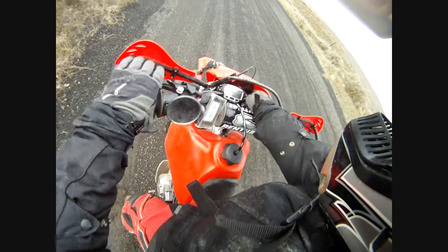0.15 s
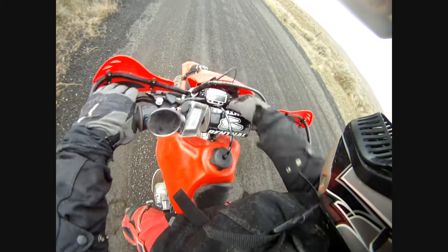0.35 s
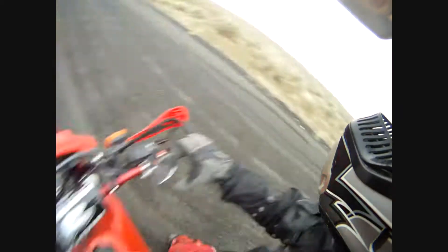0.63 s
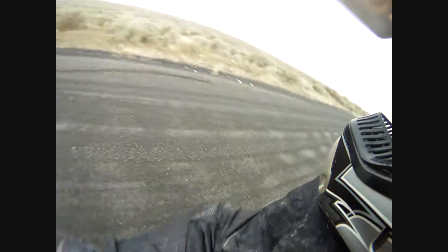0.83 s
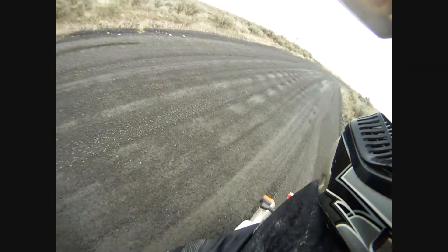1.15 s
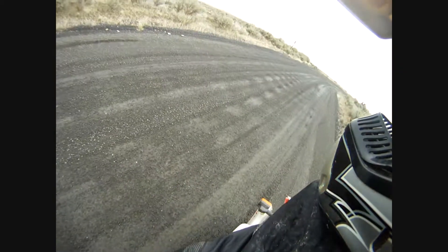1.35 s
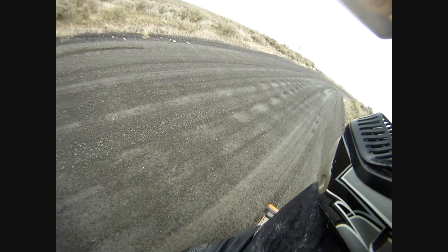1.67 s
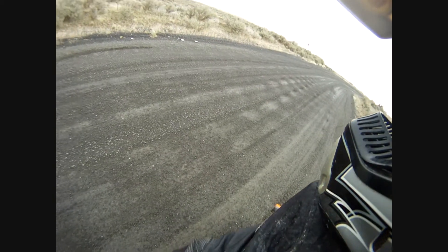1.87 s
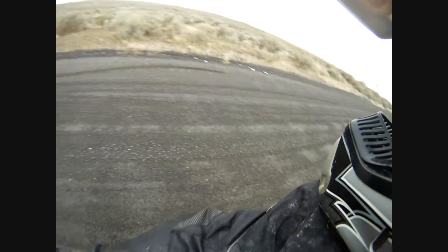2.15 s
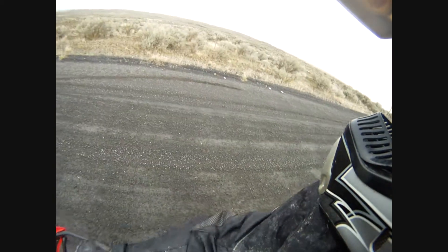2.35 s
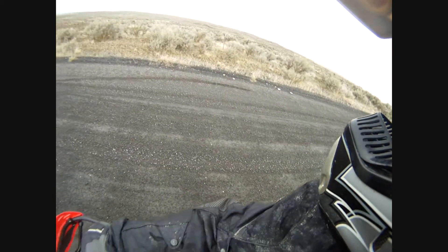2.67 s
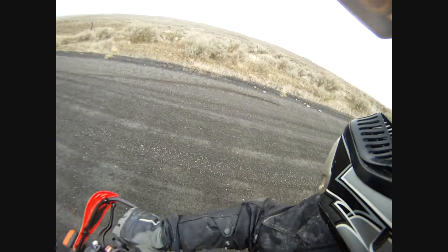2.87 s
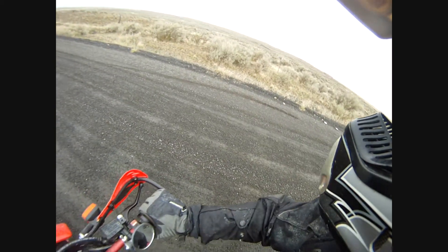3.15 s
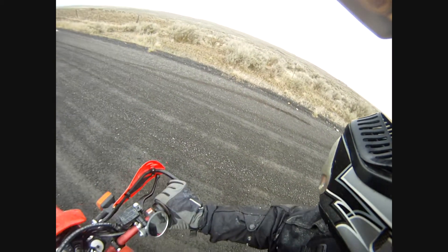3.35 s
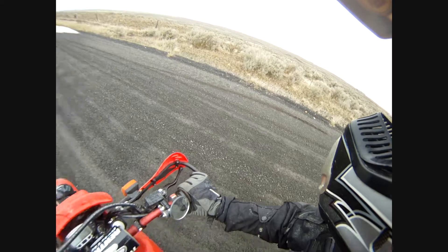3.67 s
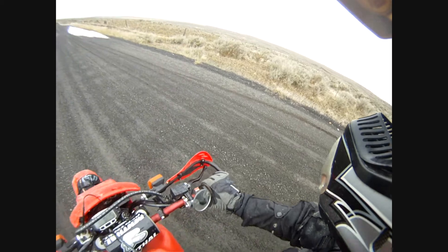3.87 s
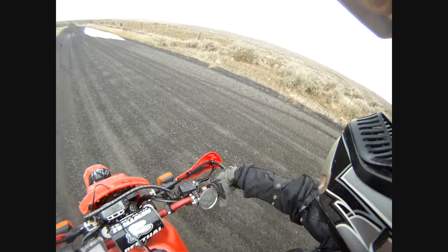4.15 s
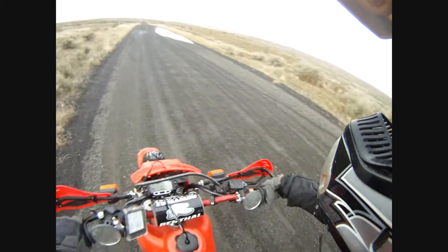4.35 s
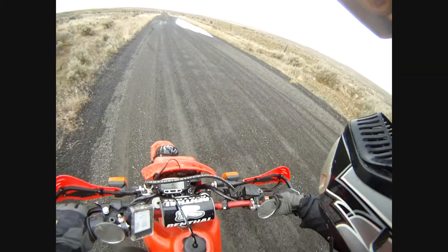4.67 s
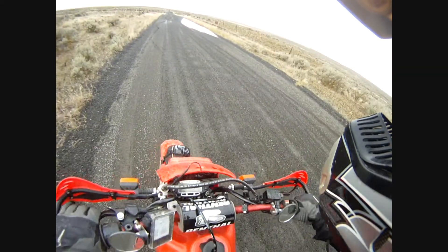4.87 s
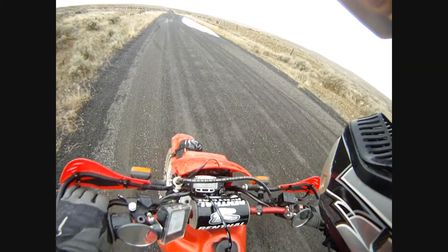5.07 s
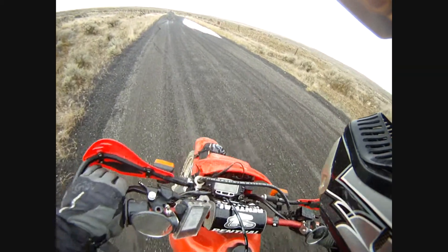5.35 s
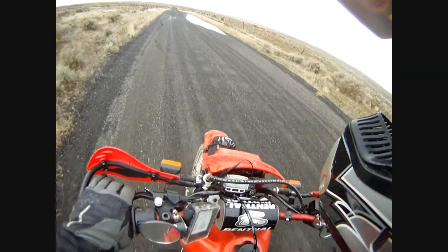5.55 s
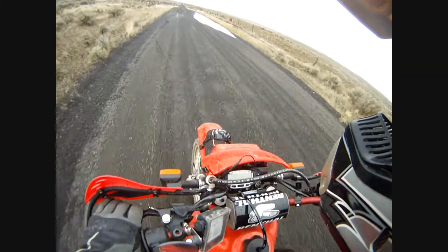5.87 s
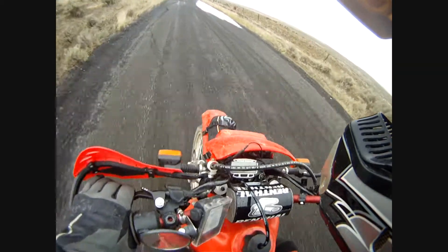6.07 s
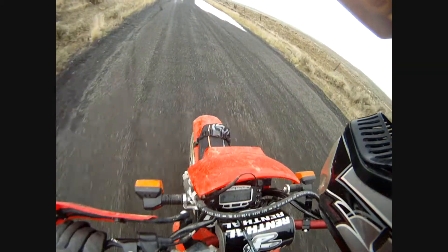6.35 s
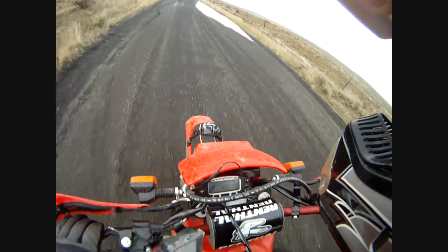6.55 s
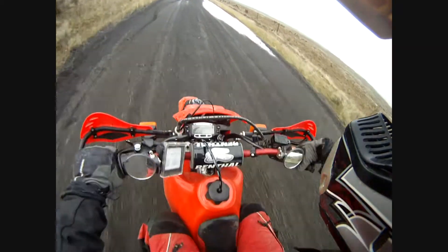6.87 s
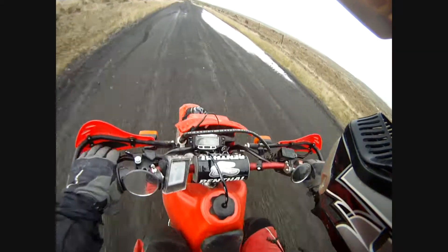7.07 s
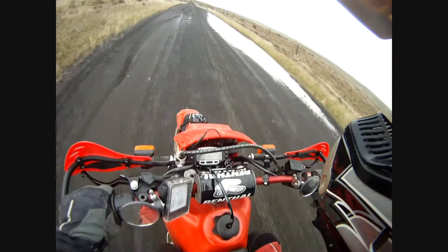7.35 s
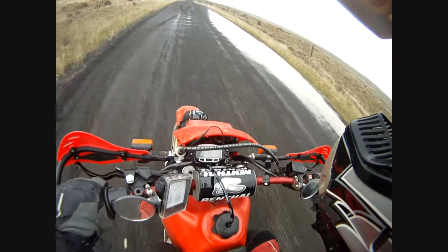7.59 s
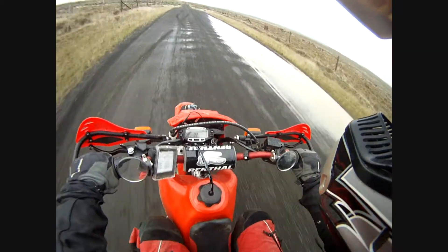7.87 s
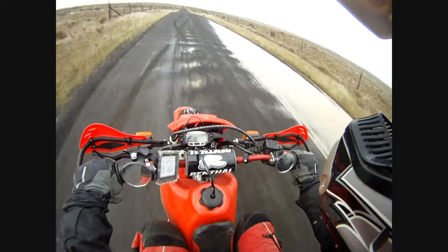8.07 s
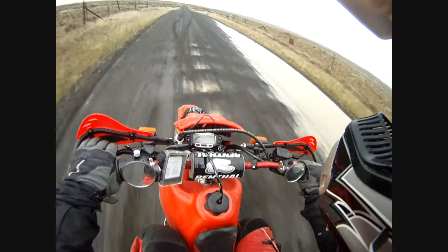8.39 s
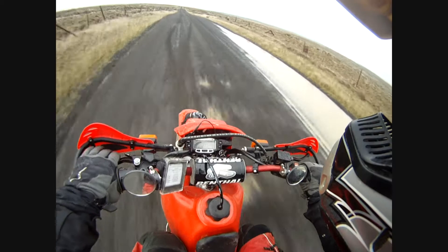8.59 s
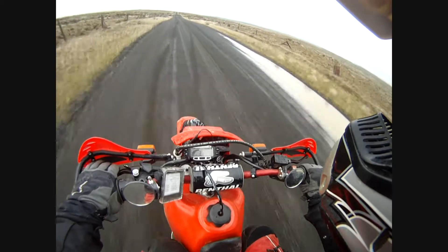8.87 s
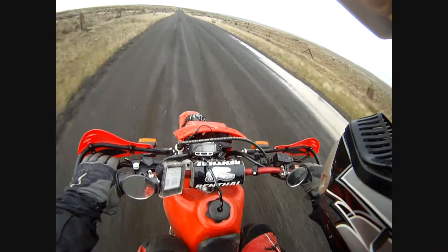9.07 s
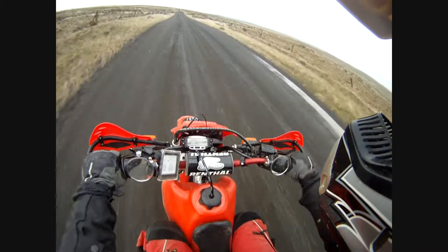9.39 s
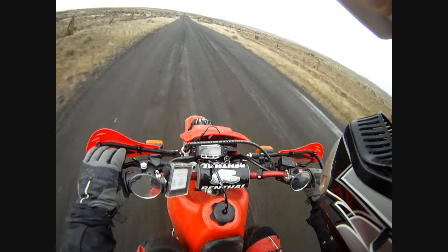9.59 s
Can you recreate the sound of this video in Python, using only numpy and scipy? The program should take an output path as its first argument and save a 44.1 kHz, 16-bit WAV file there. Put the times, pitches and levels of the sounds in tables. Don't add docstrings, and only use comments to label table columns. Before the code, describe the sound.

Close, muffled knocks and cloth rubs on a sealed camera case on a rider's helmet fill the first four seconds over faint hiss and low air rumble. A single-cylinder dirt bike then coughs a few uneven pops, catches, and pulls away along an open road, its thudding exhaust rising to a hard raspy buzz, dropping briefly for two gear changes while wind builds.

```python
import sys
import numpy as np
from scipy import signal
from scipy.io import wavfile

SR = 44100
rng = np.random.default_rng(int(sys.argv[2]) if len(sys.argv) > 2 else 0)


def natural_amplitude(level_db):
    exponent = np.asarray(level_db, float) / 20
    return 10 ** exponent


def wav_out(sig):
    wavfile.write(sys.argv[1], SR, np.round(np.clip(np.atleast_2d(sig).T, -1, 1) * 32767).astype(np.int16))


N = 429093

# time_s, opening (0-1)
THROTTLE = [(5.03, 0.18), (5.9, 0.27), (6.3, 0.42), (6.4, 0.74), (6.72, 0.91), (6.82, 0.6), (6.86, .1),
            (7.15, 0.1), (7.2, 0.83), (8.2, 0.94), (9.33, 0.86), (9.37, .1), (9.55, 0), (9.62, 0.69),
            (9.73, 0.85)]
# delay_s, level_db
PIPE_ECHOES = [(0, 13.5), (.0035, 10), (.0072, 2), (0.011, -2.5)]
# pitch_hz, width_hz, level_db
HOUSING = [(1057, 247, 6.5), (1508, 44, 13), (1908, 190, 13), (2657, 390, 5), (3675, 420, 2)]
# pitch_hz, level_db
LEAK = [(450, 4), (850, 2.5), (1800, -13)]
# pitch_hz, width_hz, level_db
BRIGHT = [(3260, 710, -4), (4295, 510, -3.5), (5960, 3140, -3.5)]


def rms_one(x):
    return x / np.sqrt(np.mean(x ** 2) + 1e-20)


def in_time(rows):
    s, *columns = np.transpose(rows)
    return [np.interp(np.arange(N) / SR, s, column) for column in columns]


def drift(rate_hz):
    r = np.exp(-40 * np.pi * rate_hz / SR)
    slow = signal.lfilter([1], [1, -2 * r, r * r], rng.standard_normal(N // 20 + 2002))[2000:]
    return np.interp(np.arange(N) / 20, np.arange(len(slow)), rms_one(slow))


def clicks(s, size):
    out = np.full(N + 2, 1e-18)
    at = np.minimum(np.asarray(s) * SR, N)
    np.add.at(out, at.astype(int), size * (1 - at % 1))
    np.add.at(out, at.astype(int) + 1, size * (at % 1))
    return out[:N]


def later(x, s):
    return np.pad(x, (round(s * SR), 0))[:N]


def dull(x, hz):
    return signal.sosfilt(signal.butter(2, hz, fs=SR, output="sos"), x)


def resonate(x, modes):
    out = 0
    for k, (hz, width_hz, db) in enumerate(modes):
        r = np.exp(-np.pi * width_hz / SR)
        b = (-1) ** k * natural_amplitude(db) * (1 - r * r) / 2 * np.array([1, 0, -1])
        out = out + signal.lfilter(b, [1, -2 * r * np.cos(2 * np.pi * hz / SR), r * r], x)
    return out


def bands(x, spectrum):
    out = 0
    for hz, db in spectrum:
        octave = signal.butter(2, [hz / 2 ** .5, hz * 2 ** .5], "band", fs=SR, output="sos")
        out = out + natural_amplitude(db) * signal.sosfilt(octave, x)
    return out


def per_unit(system, pulses):
    energy = np.sum(system(clicks([0], 0.7))[:8000] ** 2) / SR
    return system(pulses) / np.sqrt(energy)


def engine():
    # start_s, peak_db, gas_hiss_db re thud, low_tail_db re thud
    catching = [(3.929, -44, -12, 3), (4.018, -25, -2.5, -7.5), (4.071, -26.5, -4.5, -5),
                (4.119, -28, -8, -5), (4.169, -39.5, 1, 2), (4.216, -39.5, -19, 2), (4.265, -40, -17, 3),
                (4.317, -40.5, -20, 2), (4.37, -36, -16, -17), (4.425, -39.5, -6, -24),
                (4.494, -41, -14, -8), (4.556, -39.5, -25, 0), (4.623, -36, -4, -18), (4.697, -42, -20, 1),
                (4.742, -54, -16, 10), (4.795, -20.5, -2.5, -10), (4.841, -23, -14, -11),
                (4.88, -31.5, -9, -6), (4.921, -34.5, -4, -1), (4.966, -37.5, 0, -1),
                (5.009, -24.5, -6.5, -6)]
    # time_s, firings_per_s
    speed = [(5.0553, 23.02), (5.21, 27.0), (5.54, 27.41), (5.65, 26.18), (6.17, 31.33), (6.37, 35.16),
             (6.76, 55.92), (6.93, 45.5), (7.15, 39.35), (7.23, 30.86), (7.73, 43.63), (8.37, 50.08),
             (8.87, 52.45), (9.03, 55.01), (9.31, 55.12), (9.36, 48.72), (9.59, 49.55), (9.73, 42.36)]
    # shut_db at middle speed, gain_db when wide open, db_per_octave of speed
    layers = [
        (-27.5, 5, 5.5),
        (-55, 28.5, 4.5),
        (-33, 13.5, 5.5),
        (-45.5, 24, 3.5),
        (-43.5, 17, 3.5),
    ]

    (rate,), (opening,) = in_time(speed), in_time(THROTTLE)
    octaves = np.log2(rate / 40)
    thud_db, crack_db, gas_db, intake_db, throb_db = (
        shut_db + open_db * opening + octave_db * octaves for shut_db, open_db, octave_db in layers)
    thud_db = thud_db - 30 * np.maximum(np.roll(opening, round(0.017 * SR)) - opening, 0)
    load_db = np.maximum(crack_db + 31, 0)

    running = np.arange(N) >= speed[0][0] * SR
    cycle = np.cumsum(rate * running) / SR
    count = np.arange(int(cycle[-1]) + 1)
    luck = rng.standard_normal((len(count), 4))

    def moments(share):
        return np.interp(count + share, cycle[running], np.flatnonzero(running) / SR)

    def train(s, db, spread_db):
        return clicks(s, natural_amplitude(np.interp(s * SR, np.arange(N), db - 10 * np.log10(rate)) + spread_db))

    def early_thud(pulses):
        return thud(pulses, PIPE_ECHOES[:2])

    def late_thud(pulses):
        return thud(pulses, PIPE_ECHOES[2:])

    fire = moments(0) - .0004
    breathe = moments(0.5732) - .0004
    ram = moments(.53)
    start_s, peak_db, gas_rel_db, low_rel_db = np.transpose(catching)
    start_s = start_s + 0.00131

    thuds = train(fire, thud_db - 1.2 - .25 * load_db, .6 * luck[:, 0]) + clicks(start_s, natural_amplitude(peak_db - 27))
    out = per_unit(early_thud, thuds)
    out += per_unit(late_thud, thuds * natural_amplitude(-10.0 - 1.0 * load_db))
    out += per_unit(crack, train(fire - .0003, crack_db + 4, .6 * luck[:, 1]))
    puffs = train(fire, gas_db - 4.5 - 0.077 * load_db, 2.3 * luck[:, 2])
    out += gas(puffs + clicks(start_s, natural_amplitude(peak_db + gas_rel_db - 23.5)))
    out += per_unit(intake, train(breathe, intake_db - 4.0, 1.1 * luck[:, 3]))
    ram_db = thud_db - 14.5 + 24 * octaves - 15 * (1 - opening)
    out += per_unit(early_thud, train(ram, ram_db, .6 * luck[:, 3]))
    out += sigh(clicks(start_s, natural_amplitude(peak_db + low_rel_db + 7.5)))
    return out + natural_amplitude(throb_db) * throb(cycle) * running


def thud(pulses, echoes):
    # pitch_hz, width_hz, level_db
    silencer = [(116, 106, -3), (319, 436, 6), (455, 340, 5)]
    waves = sum(natural_amplitude(db) * later(pulses, s) for s, db in echoes)
    return resonate(dull(waves, hz=756), silencer)


def fronts(pulses, second_db):
    return pulses + natural_amplitude(second_db) * later(pulses, PIPE_ECHOES[1][0])


def crack(pulses):
    # pitch_hz, width_hz, level_db
    outlet = [(650, 1300, -2.5), (1160, 197, 8.5), (1524, 138, -1.5), (1897, 310, 1.5), (2730, 260, -17)]
    pair = fronts(pulses, second_db=-1)
    dip = dull(pair, hz=1900) - dull(pair, hz=486)
    return resonate(pair, outlet) - natural_amplitude(-9) * dip


def gas(pulses):
    t60_s = .032
    swell = signal.lfilter([1], [1, -natural_amplitude(-60 / (t60_s * SR))], dull(fronts(pulses, second_db=-3), hz=280))
    noise = swell * rng.standard_normal(N)
    hiss = housing(noise - 0.65 * dull(noise, hz=1630)) + natural_amplitude(-2.5) * resonate(noise, BRIGHT)
    return hiss * np.sqrt(np.sum(pulses ** 2) * SR / np.sum(hiss ** 2))


def intake(pulses):
    # pitch_hz, width_hz, level_db
    airbox = [(231.2, 91, 26.5), (467, 34, 6.5)]
    return resonate(resonate(pulses, airbox), airbox)


def sigh(pulses):
    # start_hz, end_hz, glide_s, t60_s
    start_hz, end_hz, glide_s, t60_s = (173, 61, 0.0079, 0.095)
    # pitch_hz, level_db re sinking tone, t60_s
    ring_hz, ring_db, ring_t60_s = (254, 0.5, 0.079)
    age = np.arange(5000) / SR
    hz = end_hz + (start_hz - end_hz) * np.exp(-age / glide_s)
    tone = np.sin(2 * np.pi * np.cumsum(hz) / SR) * natural_amplitude(-60 * age / t60_s)
    ring = natural_amplitude(ring_db - 60 * age / ring_t60_s) * np.sin(2 * np.pi * ring_hz * age)
    ring = ring * np.minimum(age / 0.0031, 1)
    return signal.fftconvolve(pulses, ring - tone)[:N]


def throb(cycle):
    orders_db = [
        -11,
        1.5,
    ]
    return sum(natural_amplitude(db) * np.sin(2 * np.pi * (k + 1) * cycle) for k, db in enumerate(orders_db))


def housing(x):
    return dull(resonate(x, HOUSING) + bands(x, LEAK), hz=3130)


def knocks():
    # start_s, peak_db, low_thump_db re peak, t60_s, bright_snap_db re peak
    hits = [(0.07, -42.5, 17, 0.025, -31), (0.11, -34, 4, 0.015, -29), (0.65, -31.5, 5, 0.022, -36),
            (0.73, -29, -40, 0.019, 2), (0.995, -44.5, -17, 0.028, -28), (1.743, -41, 4, 0.022, -18),
            (1.872, -47, 17, 0.023, -21), (2.19, -43.5, 16, 0.031, -12), (2.292, -40, 3.5, 0.015, -21),
            (2.537, -35, -31, 0.1, -10.5), (2.998, -54, -20, 0.031, -17), (3.662, -44, -22, 0.054, -22),
            (3.822, -40, -13, 0.035, -19), (4.632, -36, -7, 0.07, -9)]
    out = np.zeros(N)
    age = np.arange(6000) / SR

    def tone(hz, db, t60_s):
        return natural_amplitude(db - 60 * age / t60_s) * np.sin(2 * np.pi * hz * age)

    for s, peak_db, low_db, t60_s, snap_db in hits:
        at = round(s * SR)
        puff = rng.standard_normal(len(age)) * natural_amplitude(-60 * age / t60_s)
        tick = natural_amplitude(peak_db + 5.0) * (housing(puff) + natural_amplitude(snap_db + 7) * bands(puff, [(3900, 0)]))
        thump = tone(190, peak_db + low_db, 0.028)
        ring = tone(425, peak_db + low_db - 14.5, 0.25)
        out[at:at + len(age)] += tick + thump + ring + tone(1210, peak_db - 6.0, t60_s)
    return out


def rubbing():
    # start_s, length_s, rustle_db, scratch_db re rustle, shake_db re rustle
    rubs = [(0.132, 0.026, -36, -43, -15), (0.494, 0.009, -58, -3, 10), (0.85, 0.18, -60, -24, 8),
            (1.077, 0.079, -47.5, -12, 8), (1.23, 0.071, -51, -15, 5), (1.36, 0.052, -58.5, 3.5, -8),
            (1.512, 0.031, -54.5, 1.5, -4), (1.612, 0.061, -48, -5, -14), (1.778, 0.12, -49, -3.5, 6),
            (2.003, .14, -51.5, -8, 8.5), (2.163, .06, -49, -12, 16.5), (2.267, 0.038, -47.5, -5, 14),
            (2.378, .08, -65, 6.5, 22), (2.556, 0.029, -50.5, 3, 2), (2.99, .02, -60, -10, 0),
            (3.308, 0.3, -55, 3.5, -5), (3.683, 0.037, -53, 2, -3), (3.853, 0.034, -47, -1.5, -20),
            (3.954, 0.19, -54.5, -28, 13)]
    rise_db_per_s, fall_db_per_s = 620, 286
    t, power = np.arange(0, N, 64) / SR, 0
    for s, length_s, db, scratch_db, shake_db in rubs:
        rise = rise_db_per_s * np.maximum(s - t, 0)
        fall = fall_db_per_s * np.maximum(t - s - length_s, 0)
        power = power + natural_amplitude(db - rise - fall + np.array([[shake_db], [0], [scratch_db]])) ** 2
    return [np.interp(np.arange(N) / SR, t, row) for row in np.sqrt(power)]


def air_and_cloth():
    # time_s, buffeting_db, rush_db
    wind = [(0.0, -46, -58), (0.6, -54, -62.5), (0.8, -44, -62), (2.5, -52, -57.5), (2.66, -52.5, -61.5),
            (3.18, -53.5, -71), (3.26, -63, -62.5), (3.9, -58, -56), (4.2, -37.5, -45.5), (4.5, -40.5, -53),
            (5.2, -39, -43), (6.3, -39, -36.5), (6.75, -36, -24.5), (7.1, -34.5, -36), (7.8, -37, -29.5),
            (8.7, -32.5, -25), (9.4, -33, -24), (9.73, -29, -23)]
    # pitch_hz, level_db per band
    rumble_bands = [(22, -2), (40, -17.5), (70, -9.5), (120, -4), (220, -19.5), (420, -17)]
    # pitch_hz, width_hz, level_db
    flutter = [(29.9, 6, 15), (66, 8.5, 9)]
    # pitch_hz, width_hz, level_db
    cloth = [(430, 17, 12), (546, 43, 11), (1190, 160, 14), (1420, 91, 0), (2110, 190, 3.5),
             (3800, 100, -4.5)]
    # pitch_hz, width_hz, level_db
    lens_cover = [(1485, 150, 4), (2620, 440, 1.5), (3320, 560, -6.5), (5400, 1300, -2.5)]

    (buffet_db, rush_db), (shake, rustle, scratch) = in_time(wind), rubbing()
    rush_db = rush_db + 2.5 * in_time(THROTTLE)[0]
    rumble = sum(bands(rng.standard_normal(N), [point]) * natural_amplitude(4.0 * drift(6.3)) for point in rumble_bands)
    rumble = rumble + resonate(rng.standard_normal(N), flutter) * natural_amplitude(4.4 * drift(1.0))
    grains = (rng.random(N) < 500 / SR) * natural_amplitude(3.3 * np.minimum(rng.exponential(size=N), 4))
    noise = rng.standard_normal(N) * (1 + 0.34 * grains) * natural_amplitude(0.94 * drift(42))

    def patchy(modes):
        return sum(resonate(noise, [mode]) * (-1) ** k * natural_amplitude(1.4 * drift(3.8)) for k, mode in enumerate(modes))

    rush = dull(patchy(HOUSING) + bands(noise, LEAK), hz=2900)
    out = np.hypot(natural_amplitude(buffet_db), shake) * rms_one(rumble)
    out += natural_amplitude(rush_db) * rms_one(rush)
    out += natural_amplitude(rush_db - 8) * rms_one(patchy(BRIGHT))
    out += rustle * rms_one(patchy(cloth) + natural_amplitude(-8.0) * rush)
    return out + scratch * rms_one(patchy(lens_cover))


def hiss_floor():
    # pitch_hz, level_db per band
    spectrum = [(150, -44), (300, -48), (600, -49.5), (1200, -50), (2400, -53.5), (4400, -58.5)]
    return bands(rng.standard_normal(N), spectrum)


def scene():
    return (engine() + knocks() + air_and_cloth() + hiss_floor())[None]


def top_cut(x):
    return signal.sosfilt(signal.butter(12, 16470, fs=SR, output="sos"), x)


def record(dry):
    hold_rate = 12000
    rounded = 1.092 * np.tanh(dry / 1.331)
    smooth = signal.sosfilt(signal.cheby2(8, 24, 6000, fs=SR, output="sos"), rounded)
    slow = signal.resample_poly(smooth, hold_rate, SR, axis=1)
    held = signal.resample_poly(np.repeat(slow, 4, axis=1), SR, 4 * hold_rate, axis=1)
    mix = signal.sosfilt(signal.cheby2(12, 70, 16300, fs=SR, output="sos"), held[:, :N])
    return top_cut(mix)


dry = scene()
out = record(dry)
wav_out(out)
```